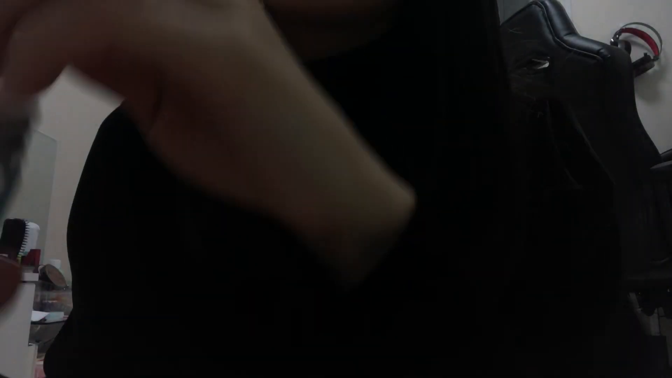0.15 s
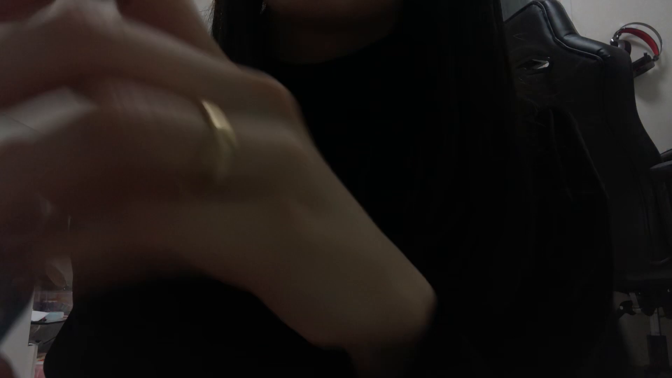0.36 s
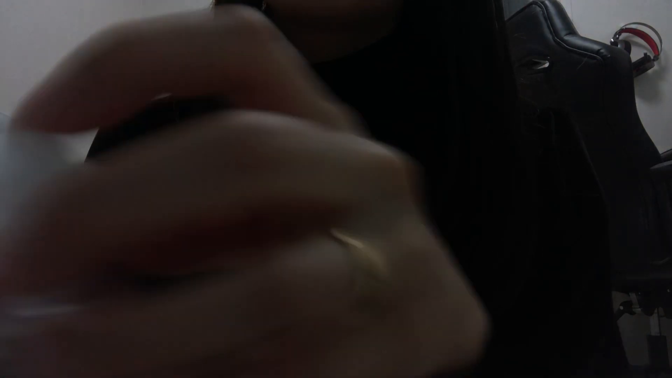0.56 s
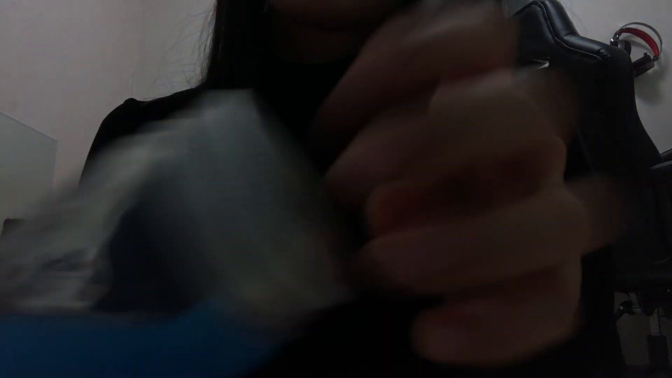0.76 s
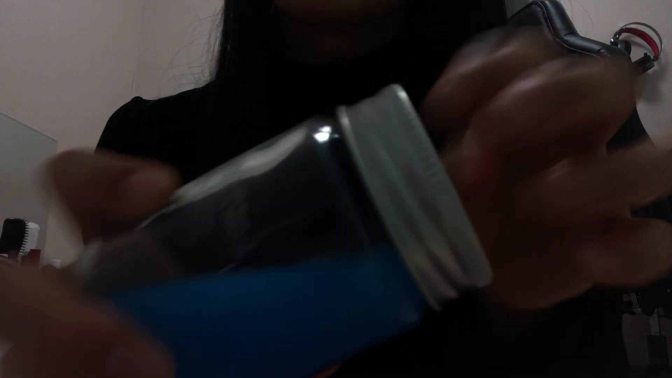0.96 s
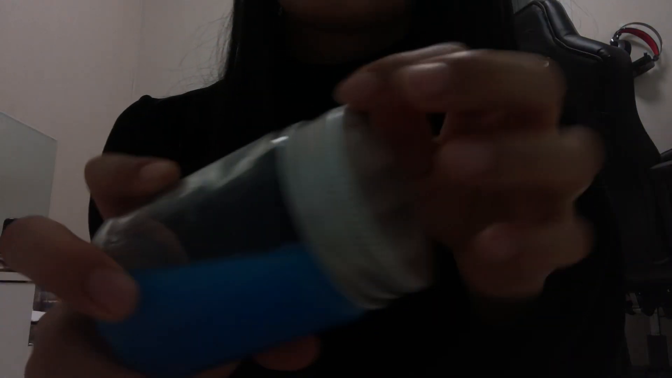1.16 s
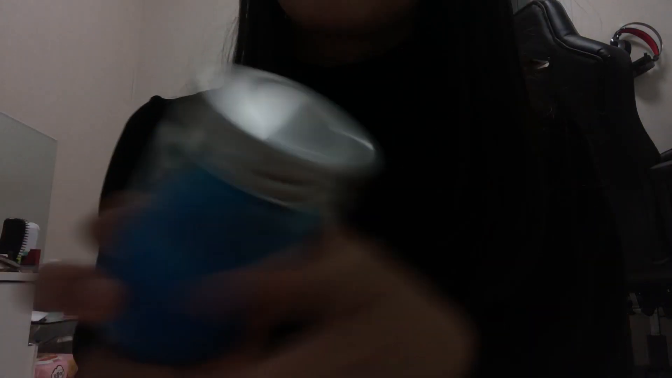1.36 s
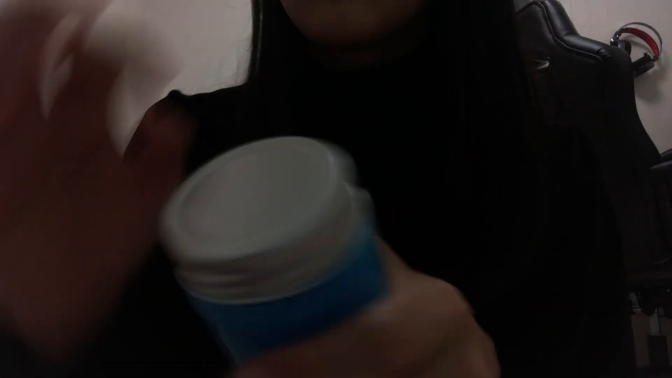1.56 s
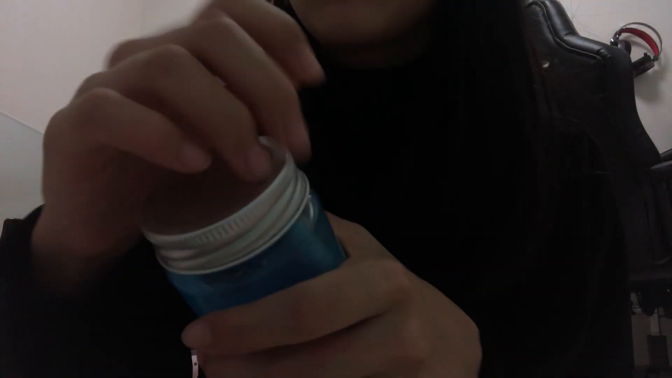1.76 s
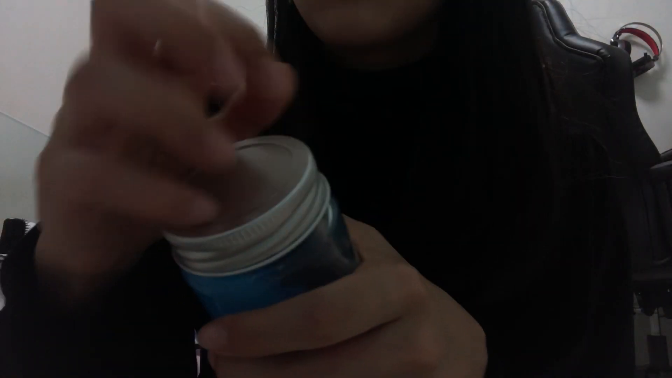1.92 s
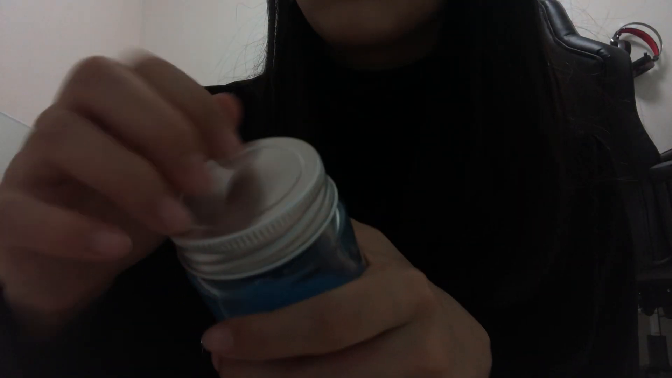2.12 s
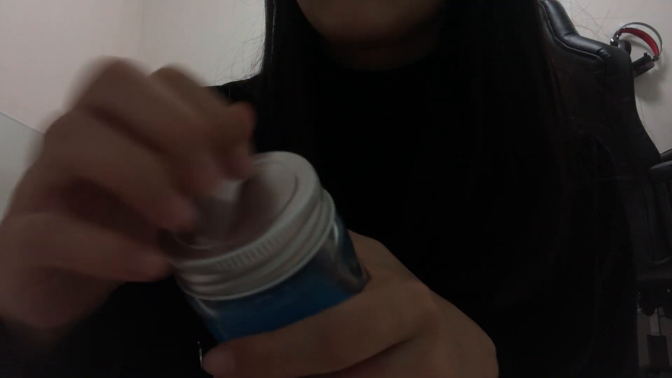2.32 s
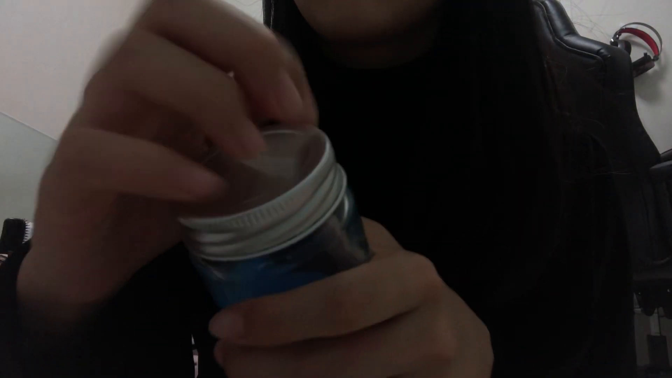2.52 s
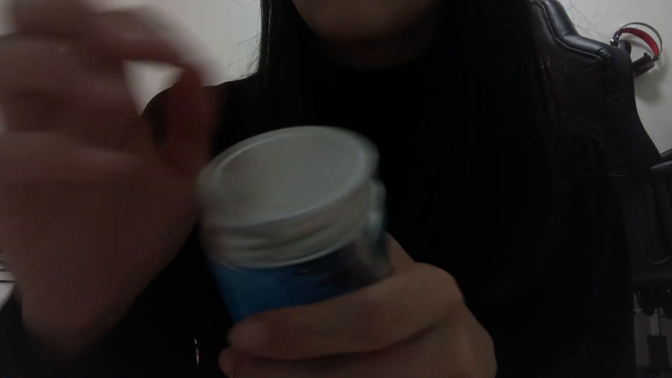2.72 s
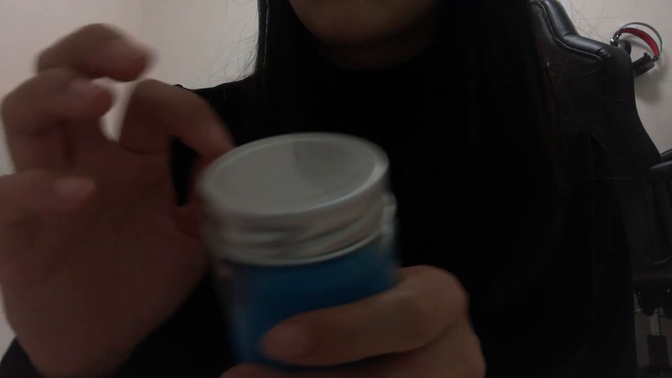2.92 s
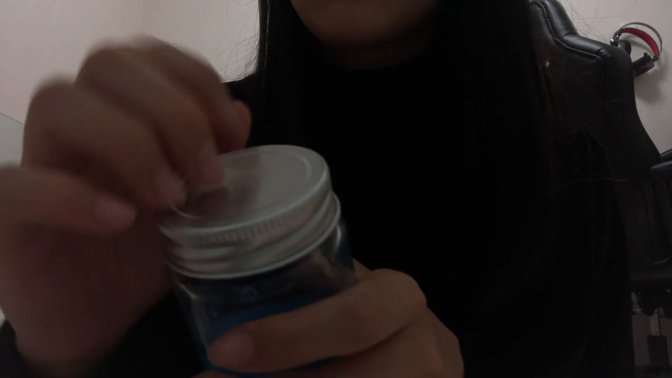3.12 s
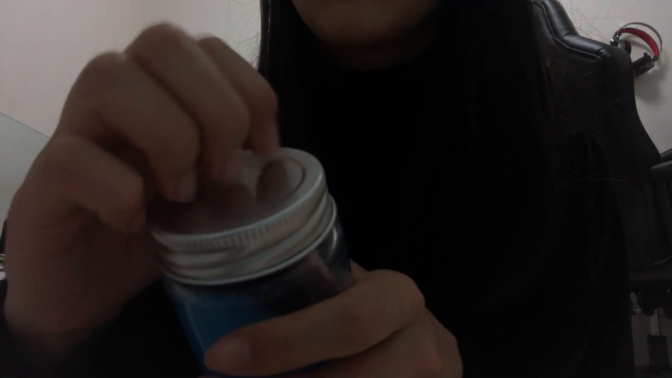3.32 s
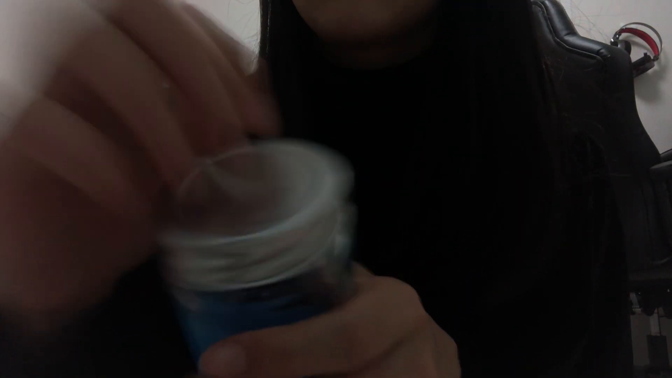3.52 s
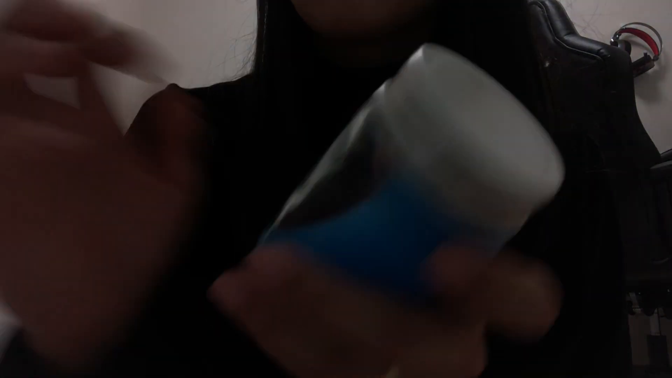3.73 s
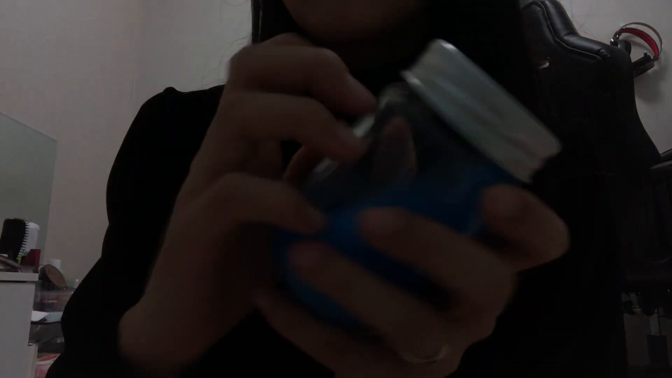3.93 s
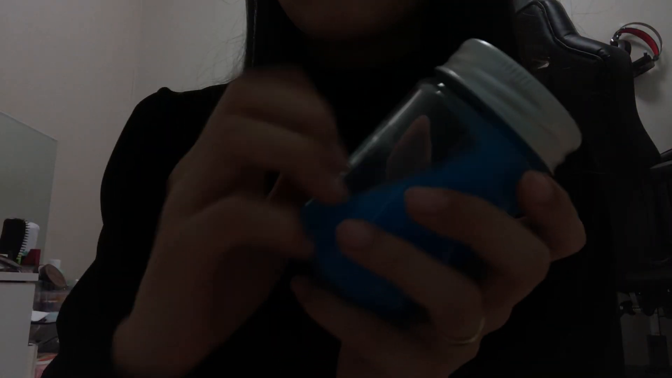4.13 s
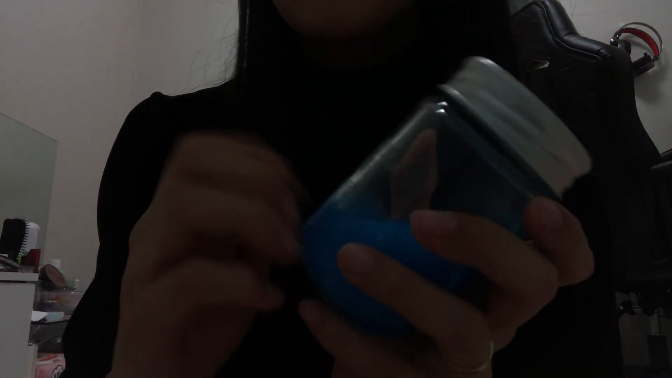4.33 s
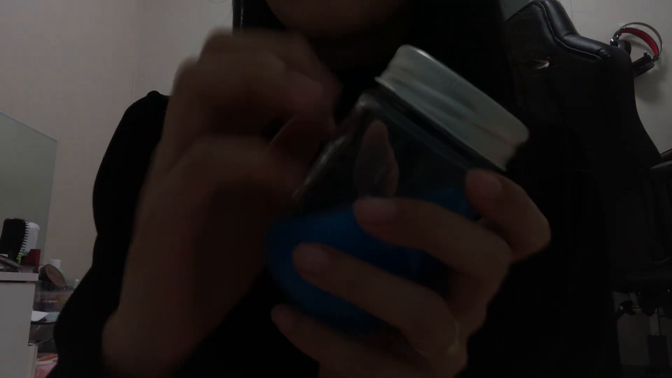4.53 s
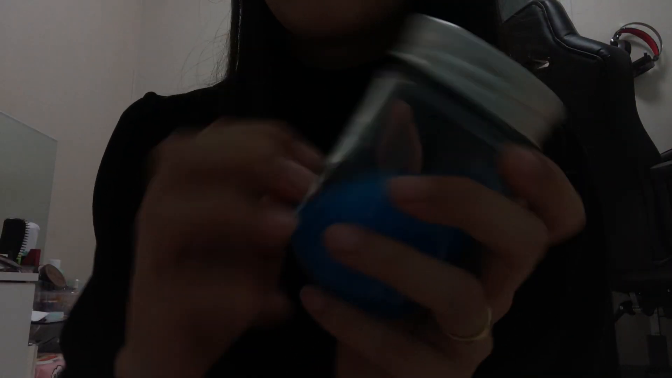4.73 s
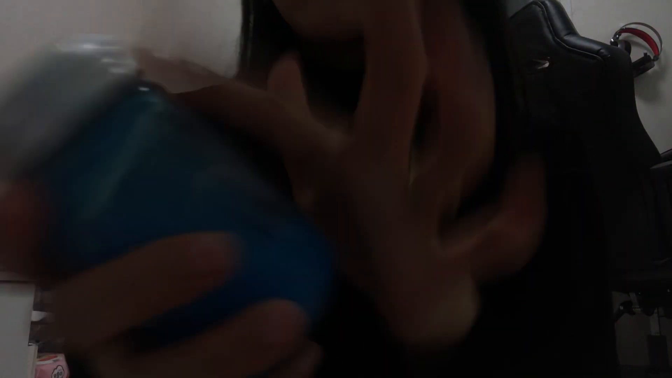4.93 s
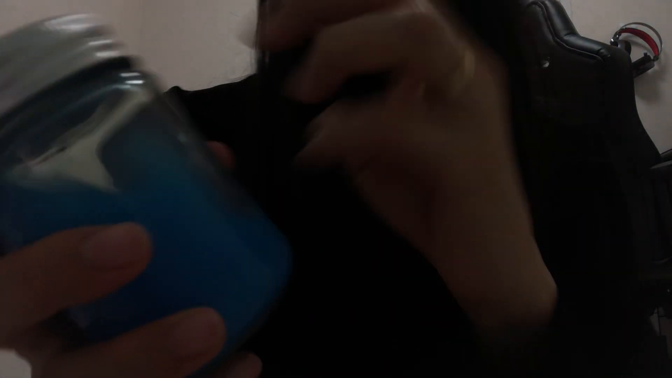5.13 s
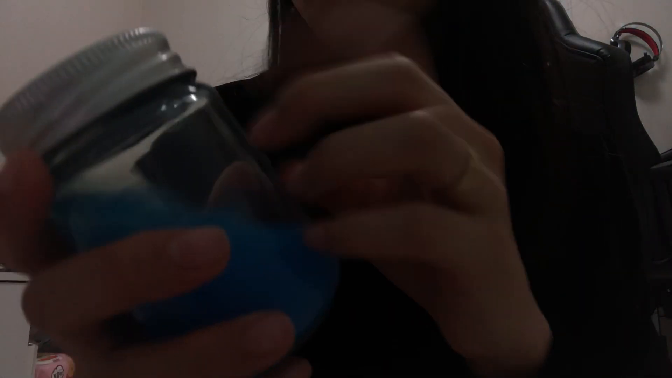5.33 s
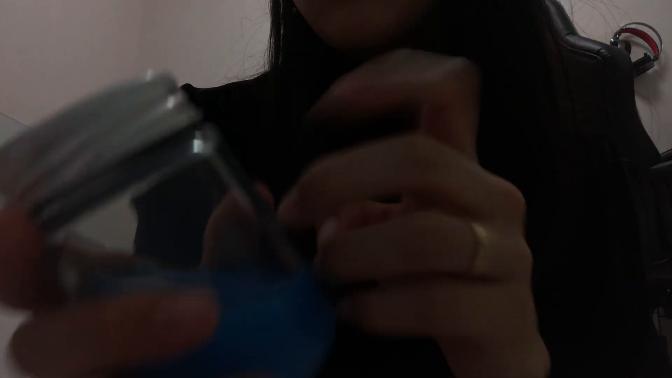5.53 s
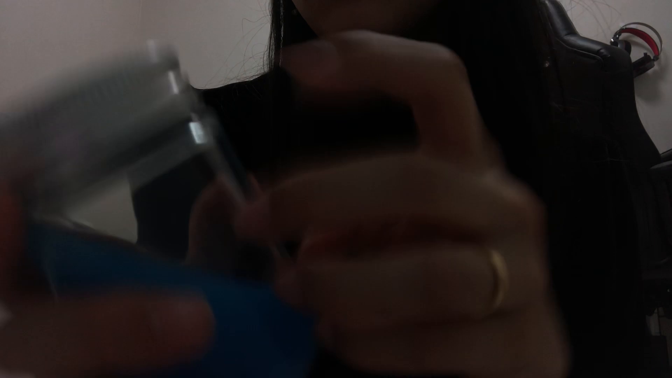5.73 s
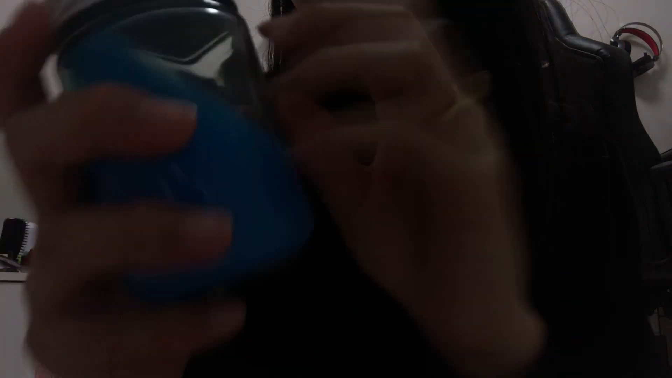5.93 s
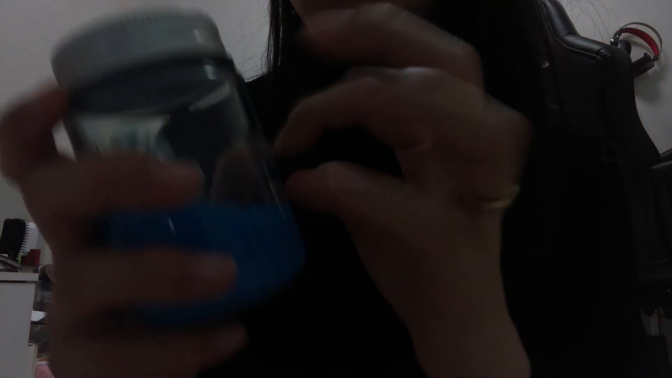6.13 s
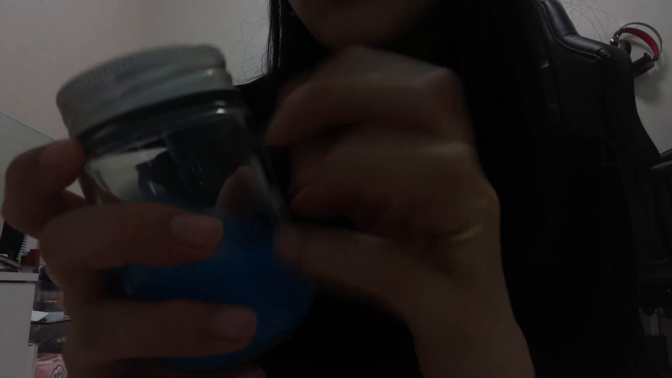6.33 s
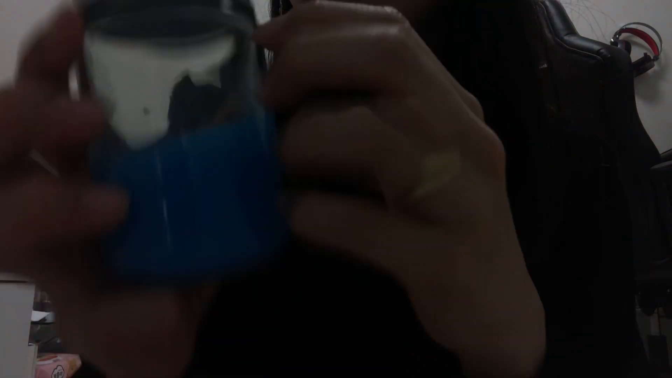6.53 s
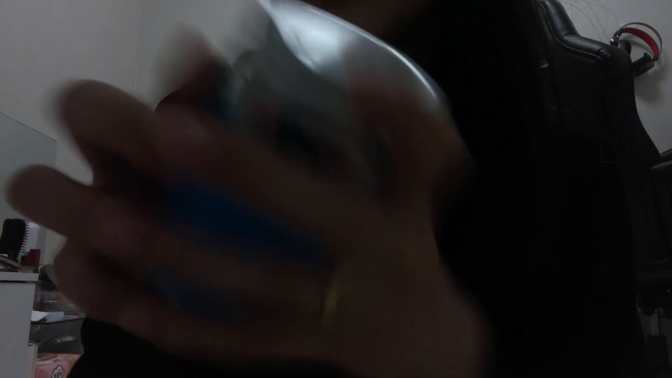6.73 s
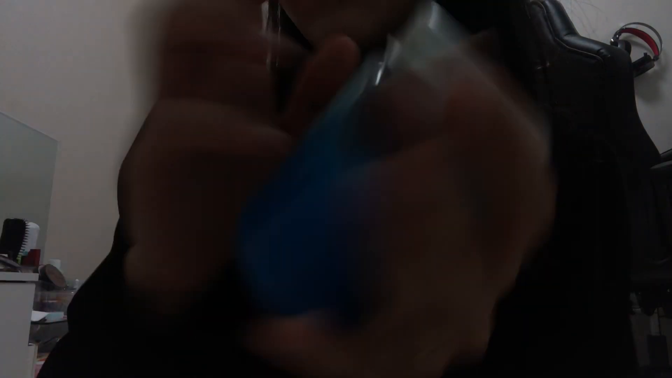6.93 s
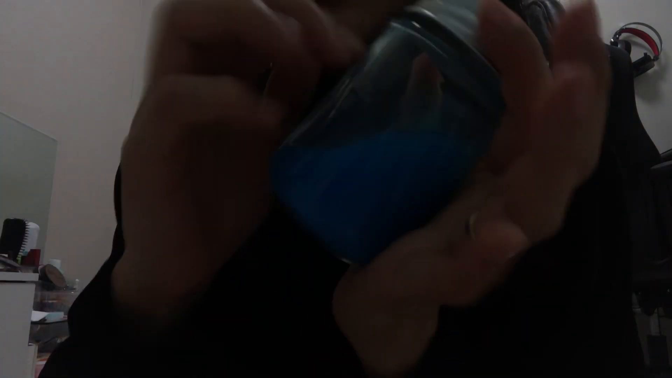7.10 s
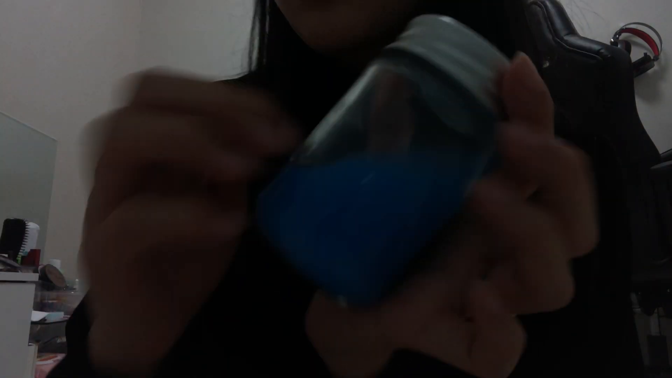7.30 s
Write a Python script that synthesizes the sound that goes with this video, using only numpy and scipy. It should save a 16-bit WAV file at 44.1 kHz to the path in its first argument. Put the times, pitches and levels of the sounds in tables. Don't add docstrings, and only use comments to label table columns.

```python
import sys
import numpy as np
from scipy import signal
from scipy.fft import rfft, irfft, next_fast_len
from scipy.io import wavfile
from scipy.ndimage import uniform_filter1d

SR = 44100
rng = np.random.default_rng(int(sys.argv[2]) if len(sys.argv) > 2 else 0)


def master_out(mix):
    frames = np.transpose(np.atleast_2d(mix))
    ceiling = np.clip(frames, -1, 1)
    pcm = np.round(ceiling * 32767).astype(np.int16)
    wavfile.write(sys.argv[1], SR, pcm)


def makeup_ratio(level_db):
    decades = np.asarray(level_db, float) / 20
    return 10 ** decades


N = 324576
TAP_LENGTH = 3000
CENTRE_HZ = 1160
TICK_WET_DB = -1.4
FIRST_TOUCH = 2.0


def at_hz(points, hz):
    points = np.array(points)
    return np.interp(np.log(hz), np.log(points[:, 0]), points[:, 1])


def rms_one(x):
    return x / np.sqrt(np.mean(x ** 2) + 1e-20)


def energy_one(x):
    return x / np.sqrt(np.sum(x ** 2) + 1e-20)


def add(track, s, sound):
    i = round(s * SR)
    track[i:i + len(sound)] += sound[:N - i]


def filtered(order, hz, kind, x):
    return signal.sosfilt(signal.butter(order, hz, kind, fs=SR, output="sos"), x)


def struck(modes, chance, vary_db, detune, contact_s):
    t = np.arange(TAP_LENGTH) / SR
    out = np.zeros(TAP_LENGTH)
    for (hz, level_db, t60), (a, b) in zip(modes, chance):
        fade = np.exp(-np.log(1000) * t / t60)
        tone = np.sin(2 * np.pi * hz * (1 + detune * b) * t)
        out += makeup_ratio(level_db + vary_db * a) * fade * tone
    return energy_one(out * (1 - np.exp(-t / contact_s)))


def causal(colour):
    hz = np.maximum(np.arange(513) * SR / 1024, 1)
    cepstrum = irfft(np.log(makeup_ratio(at_hz(colour, hz))))
    cepstrum[1:512] *= 2
    cepstrum[513:] = 0
    return irfft(np.exp(rfft(cepstrum)))[:400]


def crack(response, noise, t60, after_db, after_t60):
    t = np.arange(len(noise)) / SR
    burst = noise * (makeup_ratio(-60 * t / t60) + makeup_ratio(after_db - 60 * t / after_t60))
    return energy_one(np.convolve(burst, response))


def rumble_gain():
    # centre in seconds, peak in dB, length in seconds.
    swells = [(0.5, -69, 0.36), (3.5, -73, 0.58), (4.419, -81, .08), (4.761, -80, 0.054),
              (4.958, -65.5, 0.073), (5.47, -71, .08), (5.722, -71, 0.043), (6.3, -70.5, 0.16),
              (6.968, -68.5, 0.34)]
    t = np.arange(N) / SR
    steps = rng.standard_normal(N // 4410 + 2)
    gain = makeup_ratio(-83.5 - 1.5 * np.interp(t * 10, np.arange(len(steps)), steps))
    return gain + sum(makeup_ratio(db) * np.exp(-((t - s) / length) ** 2) for s, db, length in swells)


def air():
    # frequency in Hz, density in dB per Hz.
    noise_colour = [(15, -41.5), (30, -4), (70, 3.5), (330, 0.5), (3000, -16), (7700, -18), (10000, -25.5),
                    (16000, -25.5)]
    size = next_fast_len(N)
    hz = np.maximum(np.arange(size // 2 + 1) * SR / size, 1)
    hiss = irfft(rfft(rng.standard_normal(size)) * makeup_ratio(at_hz(noise_colour, hz)), size)[:N]
    low = filtered(2, [60, 110], "band", rng.standard_normal(N))
    return makeup_ratio(-68.5) * rms_one(hiss) + rumble_gain() * rms_one(low)


def lid_contacts():
    # start in seconds, plate energy in dB, plate pitch in Hz,
    # fingertip weight on the air below in dB, nail edge in dB.
    drumming = [(0.206, -10.5, 970, -51, 3), (0.2273, -2, 1170, 2.5, 2), (0.341, 2, 1245, -1.5, -4.5),
                (0.4111, 1.5, 1093, -9, 0.5), (0.4298, -5, 1170, 7, 5.5), (0.5181, 4, 1174, -1, 1),
                (0.641, -6, 996, -10, -0.5), (0.7059, 1.5, 1172, 0, 3.5), (0.873, 2, 1023, -5.5, 0.5),
                (0.9554, 0, 1083, -7, 0), (1.0888, -4, 1140, -4.5, 2.5), (1.0911, -5, 1132, -4.5, 2),
                (1.857, -15, 994, -45, -1), (1.946, -10, 1148, -18, -3), (2.129, -6.5, 1102, -4.5, -2.5),
                (2.2747, -11.5, 927, -15, -0.5), (2.3512, -6.5, 1080, -5.5, 0.4),
                (2.447, -8, 1085, -7, 0.2), (2.4615, -15, 1294, 3, 2), (2.578, -12, 960, -31, 1),
                (3.2579, -2, 1160, -5, -6), (3.331, -7, 1316, 6, 5), (3.436, -8.5, 992, -10, -0.5),
                (3.5449, -8.5, 1280, 3, 0)]
    # start in seconds, plate energy in dB, plate pitch in Hz, nail edge in dB.
    grazes = [(0.2424, -30.5, 1170, 9.5), (0.3555, -19, 1170, 3), (0.3948, -20, 1080, 5),
              (0.6329, -25, 980, -7), (0.8629, -24.5, 1150, 7.5), (2.389, -27, 1170, -8),
              (2.4208, -27, 1080, -8), (3.1239, -32.5, 850, 2.5), (3.5493, -18.5, 1240, 2)]
    contacts = list(drumming)
    for s, plate_db, hz, edge_db in grazes:
        weight_db = -8.5 + 0.0222 * (hz - CENTRE_HZ)
        contacts.append((s, plate_db, hz, weight_db, edge_db))
    rows = []
    for s, plate_db, hz, weight_db, edge_db in contacts:
        nail_db = plate_db + edge_db
        overtone_db = nail_db - 8.5 + 0.0172 * (hz - CENTRE_HZ)
        rows.append((s, plate_db, hz, plate_db + weight_db, overtone_db, nail_db - 5.5))
    return rows


def lid_plate(hz, lightness_db, chance):
    # multiple of plate pitch, level in dB, t60 in seconds.
    pressed = [(1.03, 8.5, 0.0075), (.78, 1.5, 0.0099), (.62, -12, 0.004), (1.25, -13, 0.0039)]
    # frequency in Hz, level in dB, t60 in seconds.
    free_ring = [(1045, -8, 0.05), (2230, -25.5, 0.021), (4200, -26.5, .02), (6120, -29.5, 0.02)]
    firmness = 1 + max(hz - CENTRE_HZ, 0) / 900
    modes = [(k * hz, level_db, t60 / firmness) for k, level_db, t60 in pressed]
    muting_db = 0.1 * max(hz - 1090, 0)
    for f, level_db, t60 in free_ring:
        lift_db = 0.2 * (lightness_db - 7) if f > 2 * hz else 0
        modes.append((f, level_db - muting_db + lift_db, t60))
    steady = np.array([(0.89, 1)] * len(pressed) + [(0.99, .12)] * len(free_ring))
    return struck(modes, chance * steady, vary_db=1.5, detune=0.063, contact_s=.0012)


def lid_cavity(track, s, plate_db, cavity_db, chance):
    # frequency in Hz, level in dB, t60 in seconds, share of the fingertip weight it follows.
    air_modes = [(212, -6.5, 0.022, 1), (475, 0, 0.011, .4), (662, -3, 0.0068, .8)]
    weight_db = max(cavity_db - plate_db, -34)
    for k, ((f, level_db, t60, share), (a, b)) in enumerate(zip(air_modes, chance)):
        swing = struck([(f, 0, t60)], [(0, b)], 0, detune=.03, contact_s=.4 / f)
        gain = makeup_ratio(plate_db + share * weight_db + level_db - 8.5 + 1.6 * a)
        add(track, s + .2 / f, -(-1) ** k * gain * swing)


def lid():
    # multiple of plate pitch, level in dB, t60 in seconds.
    overtone_modes = [(2.1, 6, 0.0084), (1.85, -14, 0.011), (2.45, -16, 0.0069)]
    # frequency in Hz, level in dB, t60 in seconds.
    metal_modes = [(3890, -2.5, 0.019), (4290, 0, 0.0099), (5960, -3.5, .007), (6476, -4.5, 0.0054),
                   (7930, -10, 0.0044)]
    # frequency in Hz, level in dB.
    metallic_colour = [(2400, -5), (3250, -12), (4150, 0.5), (5200, -6.5), (6300, -2.5), (8000, -8.5),
                       (11300, -14), (16500, -22.5)]
    # frequency in Hz, level in dB.
    plain_colour = [(2500, -8.5), (4200, 2.5), (5200, 0), (6500, -1.5), (8000, -6.5), (11300, -13),
                    (14000, -16.5), (16500, -23)]
    out, ticks, wet, plate = np.zeros((4, N))
    metallic = energy_one(causal(metallic_colour))
    plain = energy_one(causal(plain_colour))
    taps = lid_contacts()
    chance = rng.standard_normal((len(taps), 3, 8, 2))
    noise = rng.standard_normal((len(taps), 1500))
    for (s, plate_db, hz, cavity_db, over_db, tick_db), c, n in zip(taps, chance, noise):
        rim = np.interp(hz, [1060, 1170], [0, 1])
        tick = (1 - rim) * metallic + rim * plain
        add(plate, s + 0.00078, makeup_ratio(plate_db + 1.98) * lid_plate(hz, plate_db - cavity_db, c[0]))
        lid_cavity(out, s, plate_db, cavity_db, c[1])
        upper = [(k * hz, level_db, t60) for k, level_db, t60 in overtone_modes]
        overtones = -makeup_ratio(over_db + 1.4) * struck(upper, c[2], vary_db=4.5, detune=0.017, contact_s=.0005)
        add(ticks, s, overtones)
        add(wet, s, makeup_ratio(-1) * overtones)
        metal = struck(metal_modes, c[2, 3:], vary_db=3.0, detune=.02, contact_s=.0002)
        add(out, s, (1 - rim) * makeup_ratio(tick_db - 5) * metal)
        nail = crack(tick, np.r_[FIRST_TOUCH, n], t60=.0018, after_db=-21, after_t60=0.028)
        add(ticks, s, makeup_ratio(tick_db - 0.87) * nail)
        add(wet, s, makeup_ratio(tick_db + TICK_WET_DB) * energy_one(tick))
    out = out + filtered(4, 520, "high", plate + 1e-18)
    return np.array([out + ticks, out + wet])


def soft_tones(events):
    out = np.zeros(N)
    for s, hz, energy_db, t60, swell_s in events:
        add(out, s, makeup_ratio(energy_db) * struck([(hz, 0, t60)], [(0, 0)], 0, 0, swell_s))
    return out


def accents():
    # start in seconds, frequency in Hz, energy in dB, t60 in seconds, swell in seconds.
    accent_tones = [(5.462, 216, -36, 0.034, .003), (5.556, 320, -38, 0.029, .003),
                    (5.678, 240, -37, 0.026, 0.0028), (5.768, 400, -37, .02, .002),
                    (5.786, 300, -35, 0.023, 0.0027), (6.2, 250, -38, 0.027, .003),
                    (6.806, 310, -32.5, 0.033, .003), (7.298, 380, -44, 0.023, 0.0023),
                    (0.39, 2150, -20, .025, .001), (1.0915, 726, -13, 0.01, 0.00069),
                    (1.0912, 2480, -8, 0.007, .0002), (4.7115, 7800, -41, 0.0022, 0.00011),
                    (5.1, 5200, -41, 0.0022, 0.00011), (1.5345, 3380, -31, .004, 0.00018),
                    (5.9, 3500, -47, .003, .0001), (6.7945, 13000, -40, .0015, .0001),
                    (6.8148, 10100, -25, 0.0026, 0.00012), (0.706, 3700, -12.5, .004, .0001),
                    (0.874, 760, -15, 0.011, .0008), (6.039, 1340, -24, 0.0036, 0.00013),
                    (5.349, 530, -37, .012, .001), (5.37, 500, -34, .012, .001),
                    (6.8146, 13300, -13, 0.0031, .0001), (6.814, 15000, -14, .003, .0001),
                    (6.8196, 13800, -24, .004, .0001), (7.2772, 2400, -33, 0.011, .0003),
                    (7.293, 2520, -24, 0.0078, .0003), (2.3897, 2400, -27.5, 0.011, .0004),
                    (2.352, 4300, -26, 0.059, .001)]
    return soft_tones(accent_tones)


def brushes():
    # start in seconds, frequency in Hz, energy in dB, t60 in seconds, swell in seconds.
    brush_tones = [(1.857, 5900, -30, .012, .0002), (1.857, 3490, -33, .012, .0002),
                   (2.351, 15200, -30, .002, .0001), (2.4215, 14800, -42, .004, .0001),
                   (2.129, 6470, -25, .006, .0002), (3.3, 9000, -44, .001, .0001),
                   (3.672, 4500, -50, .02, .001), (4.0075, 13220, -27, .06, .0002),
                   (4.095, 13000, -42, .04, .0002), (4.1848, 9000, -38, .0012, .0001),
                   (4.226, 13300, -47, .012, .0002), (4.2965, 3700, -41, .01, .0003),
                   (4.5185, 9000, -38, .003, .0001), (5.3182, 15200, -33, .008, .0001),
                   (5.319, 2300, -31, .005, .0002), (5.4563, 15000, -35, .012, .0001),
                   (5.481, 4560, -36, .03, .003), (5.496, 4600, -36, .02, .002),
                   (6.038, 15300, -30, .008, .0001), (6.203, 6000, -45, .001, .0001),
                   (6.354, 3500, -47, .002, .0001), (6.623, 15200, -43, .015, .0002),
                   (7.124, 14500, -48, .002, .0001), (0.518, 8800, -8, .0015, .0001)]
    return soft_tones(brush_tones)


def pings():
    # start in seconds, frequency in Hz, energy in dB, t60 in seconds, swell in seconds.
    ping_tones = [(1.594, 2420, -39, 0.067, .004), (1.613, 2190, -25, 0.018, 0.0014),
                  (1.7235, 4200, -38, 0.015, 0.00087), (1.741, 4130, -47, 0.019, 0.0008),
                  (0.641, 4200, -23, 0.03, 0.00092), (0.874, 4040, -18, 0.031, .001),
                  (2.278, 4170, -35, 0.055, 0.0011), (2.124, 760, -29, 0.018, 0.0035),
                  (3.118, 186, -28, 0.056, 0.0056), (3.252, 712, -26, 0.034, 0.0045),
                  (3.26, 2730, -24, 0.097, .001), (3.334, 2540, -21, 0.065, 0.0017),
                  (3.521, 2180, -34, 0.027, .001), (4.224, 3016, -30.5, 0.014, 0.00028),
                  (4.232, 2370, -46, .08, 0.0035), (4.707, 1020, -33.5, 0.19, 0.0036),
                  (4.971, 161, -33.5, 0.03, 0.0048), (5.035, 3170, -34.5, 0.011, 0.00022),
                  (5.054, 900, -31.5, 0.056, 0.0054), (5.08, 1390, -23.5, 0.025, 0.00027),
                  (5.083, 900, -26, 0.013, 0.001), (5.085, 2440, -28.5, 0.013, 0.00044),
                  (7.056, 2620, -20, 0.031, 0.001), (7.126, 980, -32, 0.041, .003)]
    return soft_tones(ping_tones)


def wall_contacts():
    # start in seconds, first ring in dB, knock in dB,
    # nail in dB.
    wrapped = [(1.174, -37, -31, -24.5), (1.534, -30.5, -48, -24), (1.612, -34, -27, -29.5),
               (1.621, -39, -40, -33), (1.631, -40, -50, -45.5), (6.8023, -32, -39, -25)]
    # start in seconds, first ring in dB, click in dB.
    touches = [(1.4418, -40.5, -49), (1.4623, -46.5, -45), (1.49, -52, -49), (1.7403, -46.5, -57.5),
               (1.7512, -62, -45), (1.815, -38, -54.5), (3.0373, -52.5, -43), (4.1746, -44, -58),
               (4.296, -38, -41), (4.3028, -28.5, -41), (4.4902, -49, -43), (4.7365, -39, -43),
               (4.931, -58, -42), (4.95, -40, -41), (4.967, -42, -41), (4.994, -44, -48), (5.019, -40, -44),
               (5.034, -28.5, -50), (5.052, -37, -60), (5.0714, -47, -42.5), (5.0841, -32.5, -49),
               (5.4013, -36, -46), (5.5066, -24.5, -62), (5.8988, -39.5, -60), (6.249, -36, -64),
               (6.598, -50, -49.5), (6.7945, -58, -44)]
    # start in seconds, first ring in dB, knock in dB, nail in dB, place as second ring over third in dB.
    wall_taps = [ (4.001, -26, -26, -34.5, 4), (4.0073, -10, -13.5, -21, 5), (4.0096, -9, -19, -22.5, 6),
                 (4.094, -13, -25, -36.5, 3), (4.1669, -38, -55, -36, 29), (4.187, -20, -29, -34, -23),
                 (4.2252, -28, -46, -45, 13), (4.2564, -19, -28.5, -31.5, -3), (4.3414, -24, -23, -30, 4),
                 (4.436, -22.5, -26, -36, 13), (4.515, -16.5, -22.5, -31, -3),
                 (4.6185, -17, -29.5, -38, -4), (4.7, -22.5, -29, -37, -7),
                 (4.8024, -16, -19.5, -21.5, -4),
                 (5.2842, -20.5, -41, -44.5, 3.5), (5.3182, -27, -26.5, -28.5, -3),
                  (5.3472, -23.5, -28, -36.5, 6), (5.3682, -17, -31, -40, 1),
                  (5.4563, -11.5, -24.5, -25, -3), (5.4864, -23, -39, -60, 4),
                  (5.539, -49, -28.5, -32.5, -2), (5.55, -23, -28, -29.5, -4),
                  (5.5553, -19.5, -30, -34, -20), (5.674, -17.5, -33, -34.5, 1),
                  (5.7411, -29.5, -22, -31, 4), (5.7635, -21, -18, -27, 6), (5.7797, -21, -24.5, -29.5, 14),
                  (6.007, -20, -40, -31, 7), (6.038, -18.5, -18.5, -17.5, 1), (6.0447, -15.5, -26, -37, -3),
                  (6.1957, -20, -35, -31.5, -16), (6.265, -32, -20, -27, 7), (6.2877, -17, -13, -25, 14),
                  (6.2989, -18, -22, -23, 16), (6.3779, -22, -24, -29, 11),
                 (6.4804, -25, -18, -28.5, -1), (6.5013, -12, -15, -22.5, 8), (6.5149, -16.5, -29, -27, 3),
                (6.6221, -27, -29.5, -33.5, 5), (6.815, -9.5, -29, -6.5, 39.5),
                (6.821, -28.5, -39, -36, 18.5), (6.8187, -34, -36, -17.5, 20),
                (6.8215, -29, -46.5, -22, 25), (7.056, -28, -24, -26, 7), (7.0712, -44, -34, -36.5, -11),
                (7.0753, -14.5, -17, -24, 5), (7.184, -18, -16, -21.5, -5), (7.2774, -45, -32, -34, -17),
                (7.291, -45, -18, -19.5, -28), (7.2991, -28, -21.5, -28, -1)]
    rows = []
    for s, first_db, knock_db, nail_db, place_db in wall_taps:
        rings_db = nail_db + 3
        second_db = rings_db - 10 * np.log10(1 + makeup_ratio(-2 * place_db))
        third_db = rings_db - 10 * np.log10(1 + makeup_ratio(2 * place_db))
        rows.append((s, first_db, second_db, third_db, knock_db, nail_db))
    for s, first_db, click_db in touches:
        nail_db = click_db - 4
        rows.append((s, first_db, nail_db - 5.5, nail_db - 5.5, click_db, nail_db))
    for s, first_db, knock_db, nail_db in wrapped:
        rows.append((s, first_db, nail_db - 24, nail_db - 24, knock_db, nail_db))
    return rows


def upper_rings(second_db, third_db, chance):
    # frequency in Hz, level in dB, t60 in seconds.
    second_pair = [(7944, -3, 0.032), (7800, -7.5, .018)]
    # frequency in Hz, level in dB, t60 in seconds.
    third_pair = [(9140, 2, 0.023), (9300, 1, 0.023)]
    # frequency in Hz, level in dB, t60 in seconds.
    highest = [(13380, 0, .024), (15150, 0, .014), (13800, -7, .012)]
    second = struck(second_pair, chance[1], vary_db=2.5, detune=0.0052, contact_s=0.00032)
    third = struck(third_pair, chance[2], vary_db=5.0, detune=0.004, contact_s=.0001)
    high = struck(highest, chance[3], vary_db=3.0, detune=.006, contact_s=.0001)
    high_gain = makeup_ratio(-16.5) * np.hypot(makeup_ratio(second_db), makeup_ratio(third_db))
    return -makeup_ratio(second_db - 2.5) * second + makeup_ratio(third_db + 2.05) * third + high_gain * high


def wall():
    # time in seconds, frequency in Hz.
    glass_pitch = [(1.8, 4610), (4.0, 4490), (4.09, 4600), (4.19, 4570), (4.3, 4370), (4.35, 4380),
                   (4.43, 4590), (4.8, 4545), (5.03, 4400), (5.285, 4650), (5.46, 4570), (6.04, 4610),
                   (6.29, 4685), (6.62, 4600), (6.82, 4670), (7.075, 4540), (7.18, 4670)]
    # frequency in Hz, level in dB.
    tick_colour = [(3500, -3.5), (5500, 7), (7000, 4), (9000, -10.5), (11000, -18), (13500, -18),
                   (15300, -8.5), (17000, 0)]
    # frequency in Hz, level in dB.
    knock_colour = [(200, -17.5), (500, -1), (1000, 1), (1600, 2), (2500, -1.5), (3500, -5.5), (5000, -14)]
    out, ticks, wet = np.zeros((3, N))
    taps = wall_contacts()
    tick, knock = causal(tick_colour), causal(knock_colour)
    choke = np.exp(-(np.arange(TAP_LENGTH) / SR / 0.029) ** 2)
    chance = rng.standard_normal((len(taps), 4, 3, 2))
    noise = rng.standard_normal((len(taps), 2, 1500))
    for (s, first_db, second_db, third_db, knock_db, tick_db), c, n in zip(taps, chance, noise):
        hz = np.interp(s, *np.transpose(glass_pitch))
        soft_s = 0.000067 * makeup_ratio(2.4 * np.clip(first_db - tick_db - 27.5, 0, 15))
        first = struck([(hz, 0, 0.024 * makeup_ratio(2.5 * c[0, 2, 0]))], c[0], 0, .003, soft_s)
        ring = makeup_ratio(first_db + 0.3) * energy_one(choke * first)
        add(ticks, s, ring)
        add(wet, s, makeup_ratio(-0.5) * ring)
        twin = struck([(hz * 1.022, 0, 0.27)], c[0], 0, 0.0031, soft_s)
        add(out, s, makeup_ratio(first_db - 36 + c[0, 1, 0]) * twin)
        add(out, s, upper_rings(second_db, third_db, c))
        thump = crack(knock, np.r_[FIRST_TOUCH, n[0]], t60=0.004, after_db=-16.0, after_t60=0.025)
        nail = crack(tick, np.r_[FIRST_TOUCH, n[1]], t60=0.0019, after_db=-25.0, after_t60=0.042)
        add(ticks, s, makeup_ratio(knock_db - 1.5) * thump)
        add(ticks, s, makeup_ratio(tick_db + 1.5) * nail)
        add(wet, s, makeup_ratio(knock_db + 1.5) * energy_one(knock))
        add(wet, s, makeup_ratio(tick_db + TICK_WET_DB) * energy_one(tick))
    return np.array([out + ticks, out + wet])


def spread(x, count=5):
    bend = np.tan(np.pi * 300 / SR)
    a = (1 - bend) / (1 + bend)
    return signal.sosfilt([[-a, 1, 0, 1, -a, 0]] * count, x + 1e-18)


def room(x):
    # frequency in Hz, t60 in seconds.
    decay = [(150, 0.063), (500, 0.45), (1200, 0.34), (3000, 0.29), (7000, 0.4), (14000, 0.54)]
    # frequency in Hz, level in dB.
    tail_colour = [(150, 6), (500, 6), (720, 5), (1200, 3.5), (2000, 2), (3000, -3.5), (7000, 0),
                   (15000, -8.5)]
    # frequency in Hz, level in dB, t60 in seconds.
    standing_waves = [(478, -17, 0.34), (776, -30.5, .4)]
    t = np.arange(SR // 2) / SR
    borders = 100 * 2 ** np.arange(0, 7.6, .5)
    white = rng.standard_normal((2, len(t)))
    tail = np.zeros(len(t))
    for k, (low, high) in enumerate(zip(borders, borders[1:])):
        hz = np.sqrt(low * high)
        band = filtered(2, [low, high], "band", white[k % 2])
        power = uniform_filter1d(band ** 2, int(max(.006, 2.5 / (high - low)) * SR))
        band = band / power ** 0.35 * np.std(band) ** 0.7
        tail += makeup_ratio(at_hz(tail_colour, hz) - 60 * t / at_hz(decay, hz)) * band
    for hz, level_db, t60 in standing_waves:
        tail += makeup_ratio(level_db - 60 * t / t60) * np.sin(2 * np.pi * hz * t)
    tail = tail * np.clip(t / 0.0045 - .6, 0, 1)
    return makeup_ratio(-15.5) * signal.fftconvolve(x, energy_one(tail))[:N]


def scene():
    jar = spread(lid() + wall() + pings() + accents() + brushes())
    direct, sent = filtered(3, 150, "high", jar)
    return (direct + room(sent) + air())[None, :]


def top_cut(x):
    return signal.sosfilt(signal.butter(12, 17040, fs=SR, output="sos"), x)


def record(dry):
    x = filtered(2, 70, "high", dry)
    x = signal.sosfilt(signal.cheby2(10, 60, 17300, fs=SR, output="sos"), x)
    return top_cut(x)


dry = scene()
out = record(dry)
master_out(out)
```